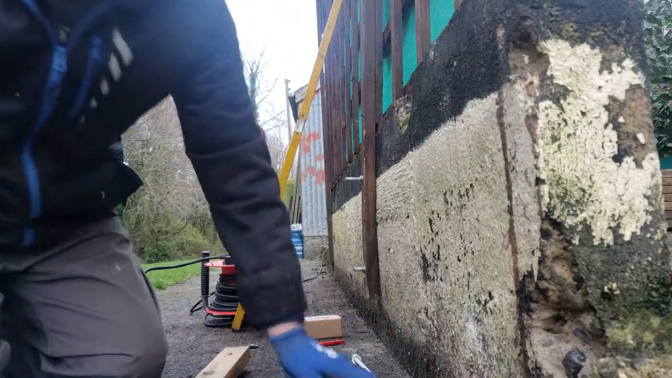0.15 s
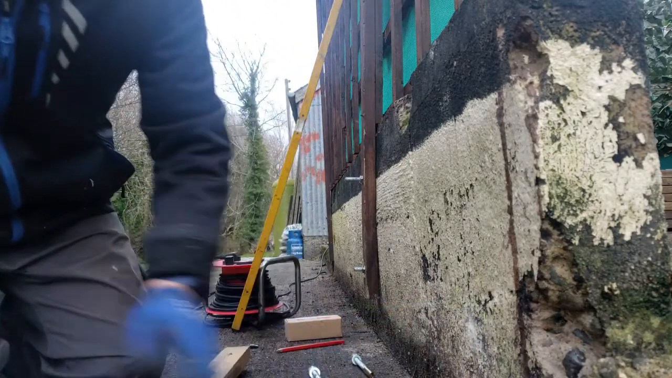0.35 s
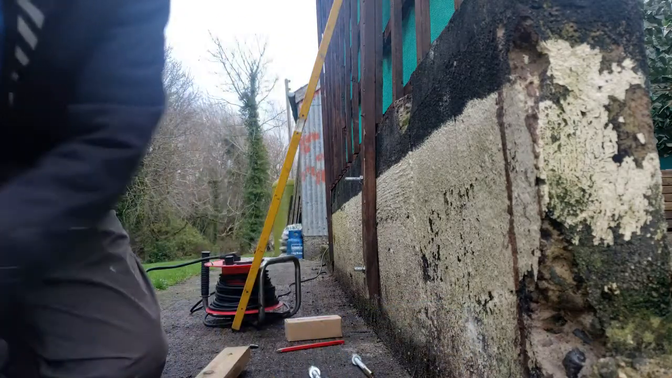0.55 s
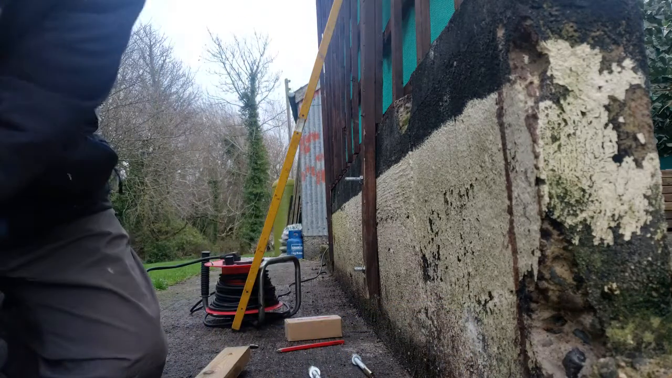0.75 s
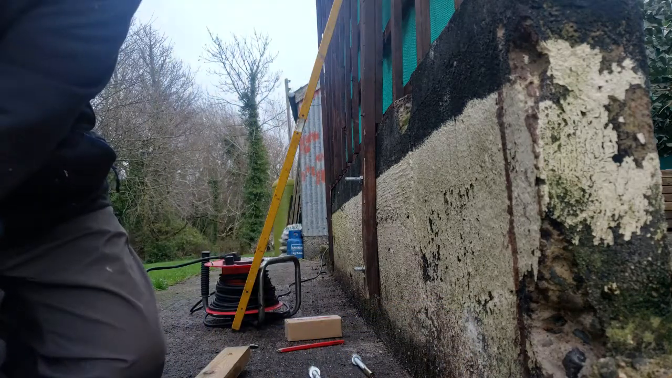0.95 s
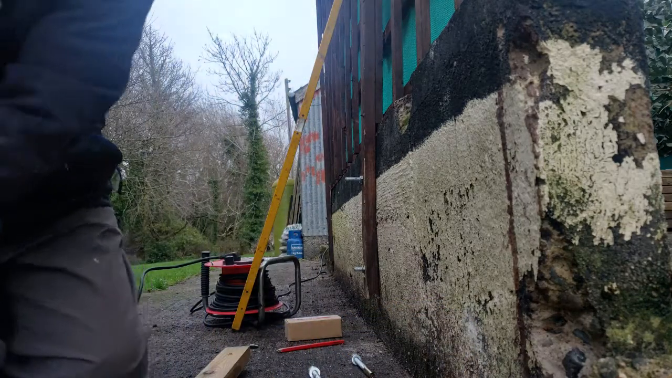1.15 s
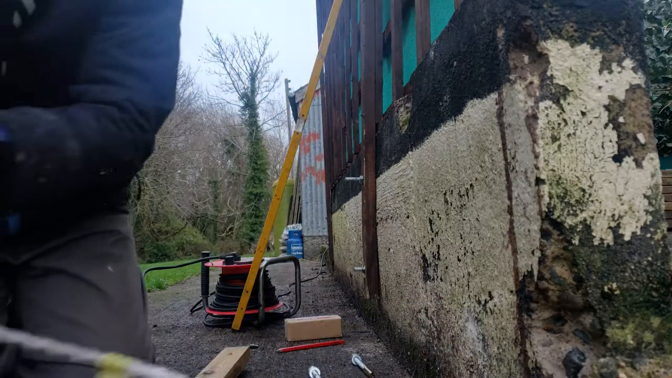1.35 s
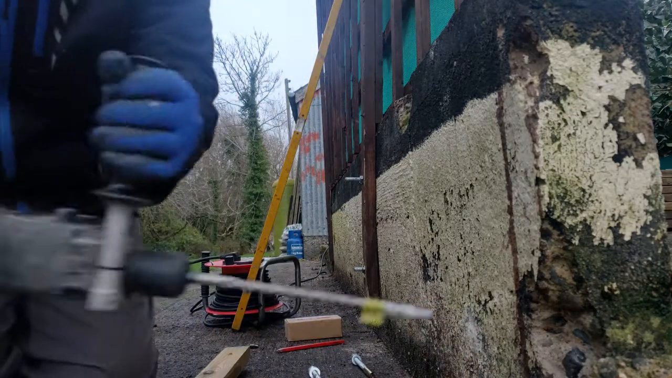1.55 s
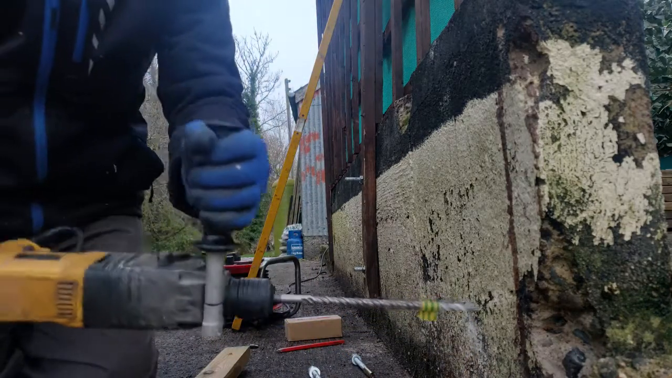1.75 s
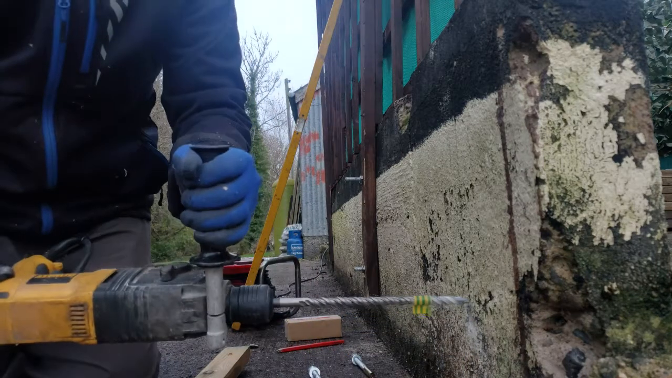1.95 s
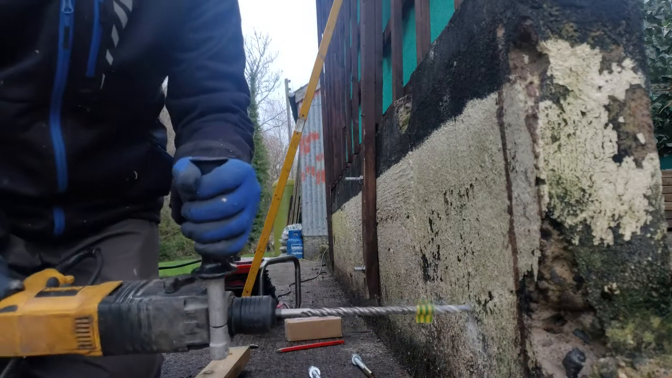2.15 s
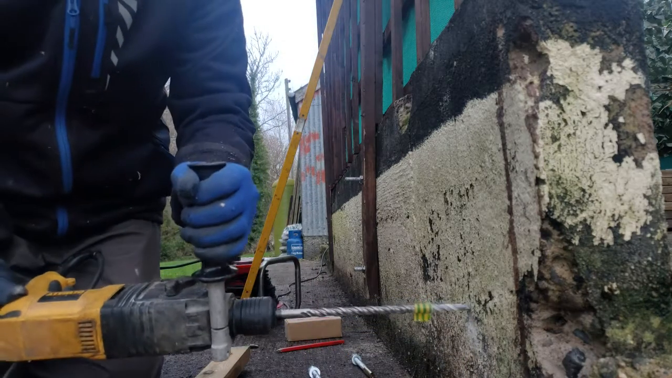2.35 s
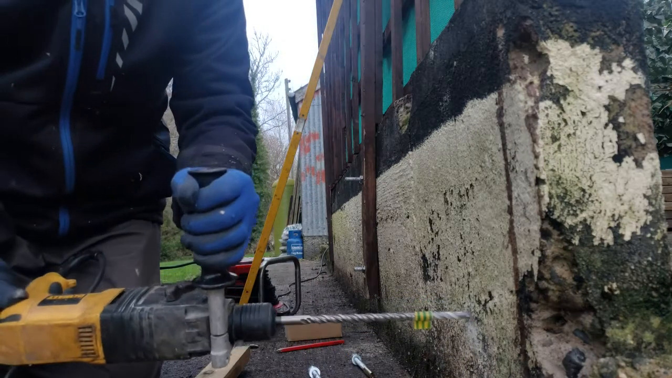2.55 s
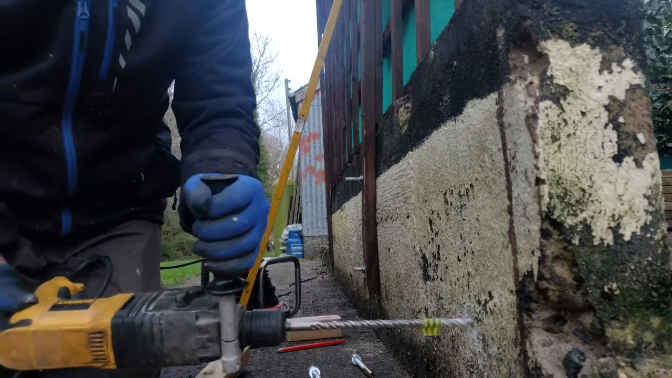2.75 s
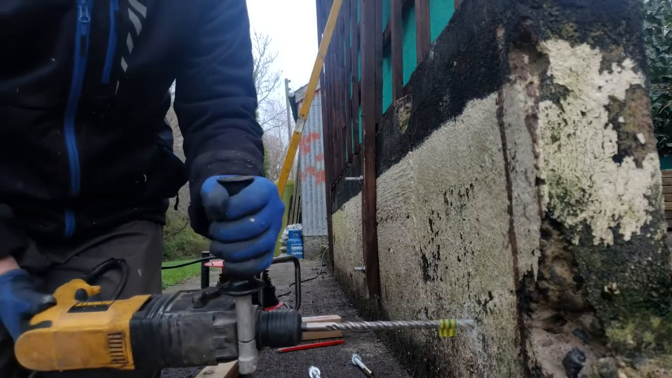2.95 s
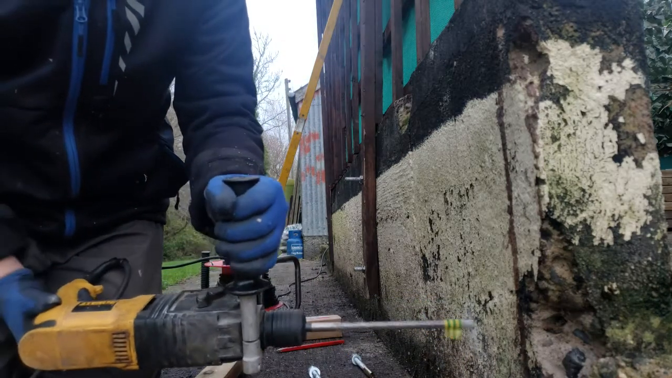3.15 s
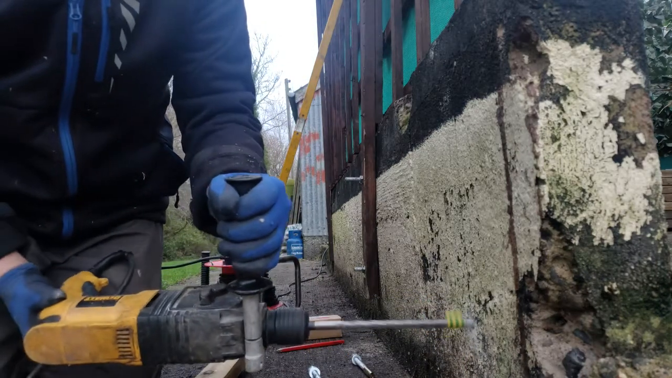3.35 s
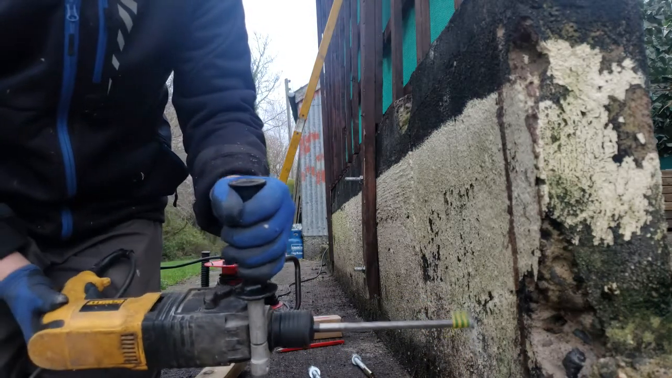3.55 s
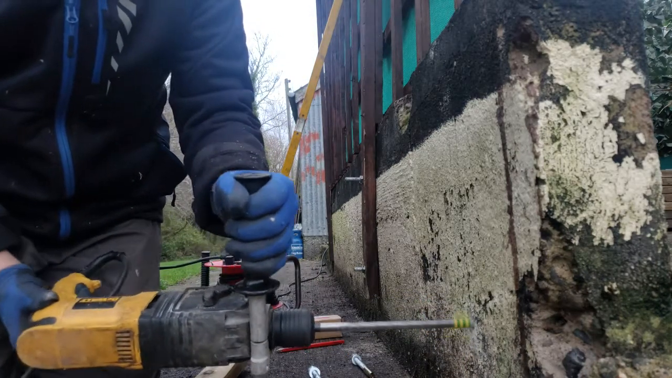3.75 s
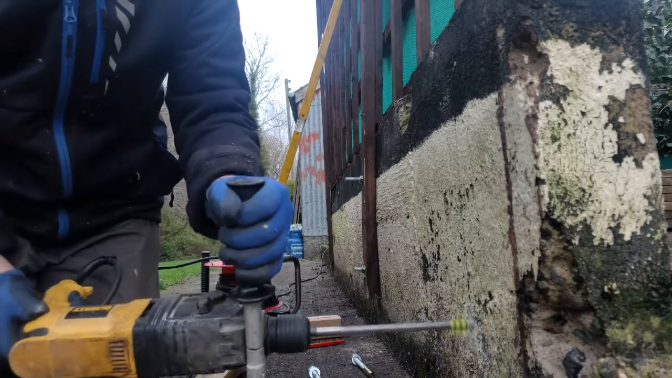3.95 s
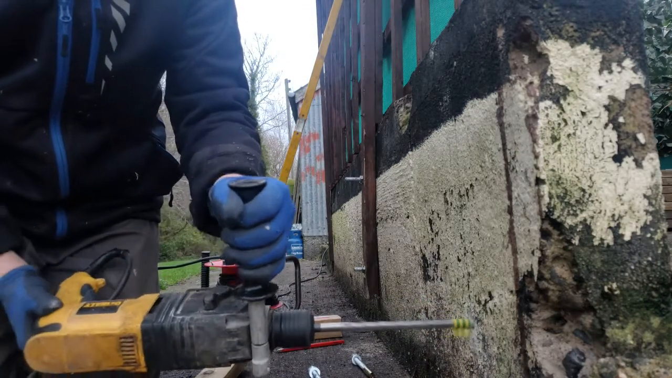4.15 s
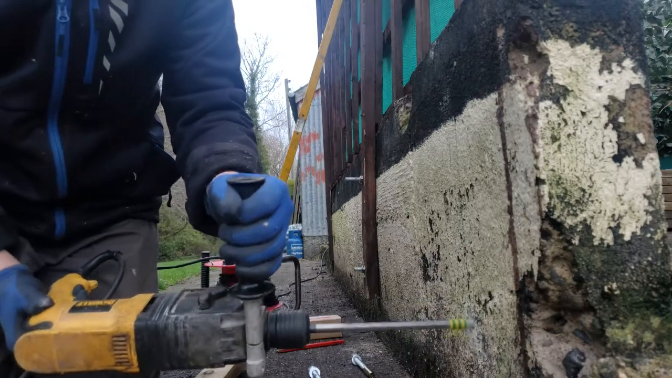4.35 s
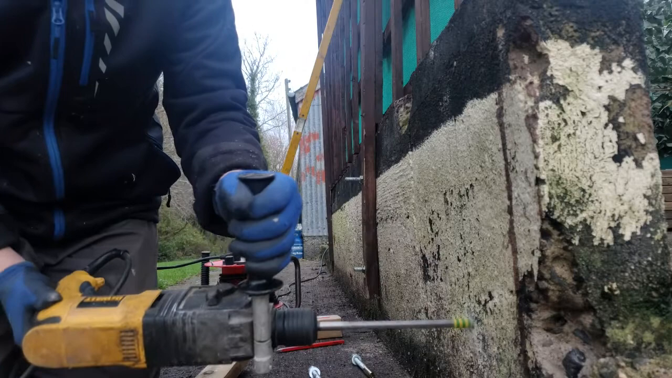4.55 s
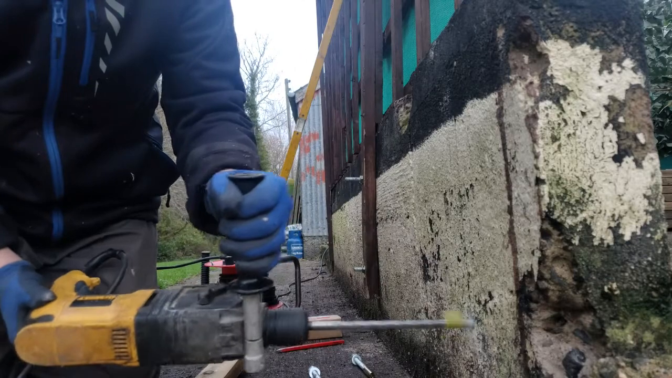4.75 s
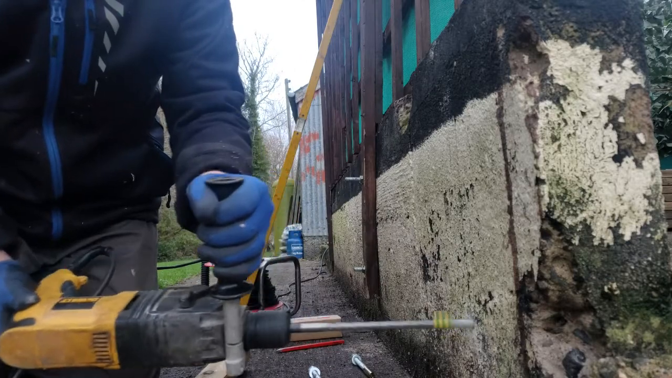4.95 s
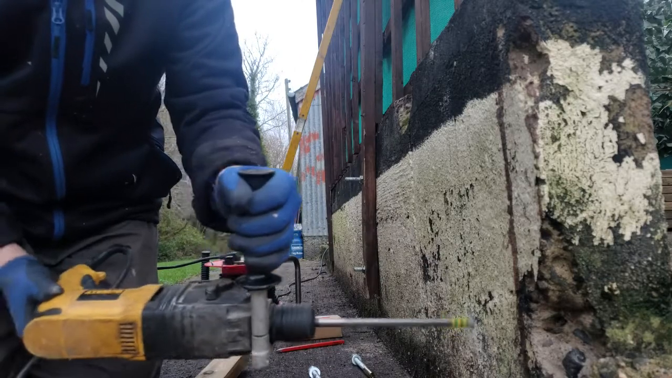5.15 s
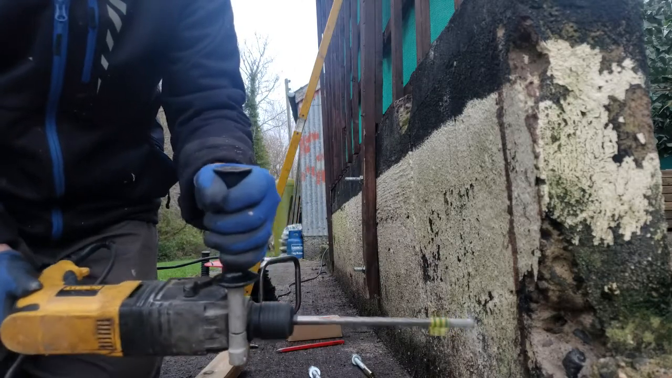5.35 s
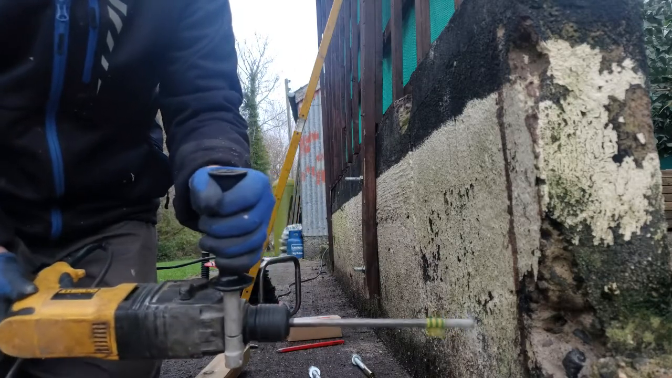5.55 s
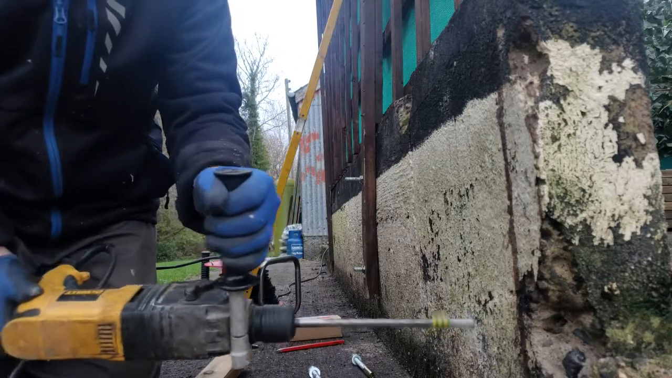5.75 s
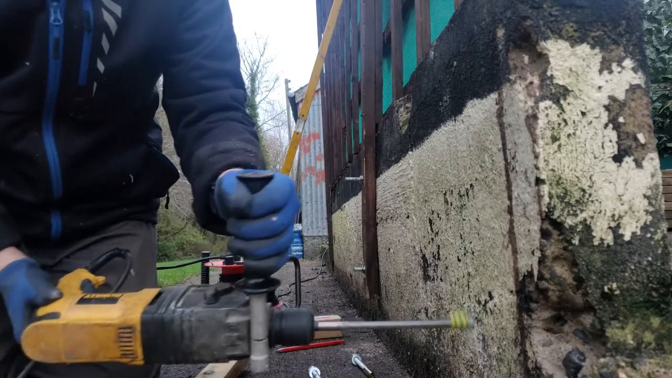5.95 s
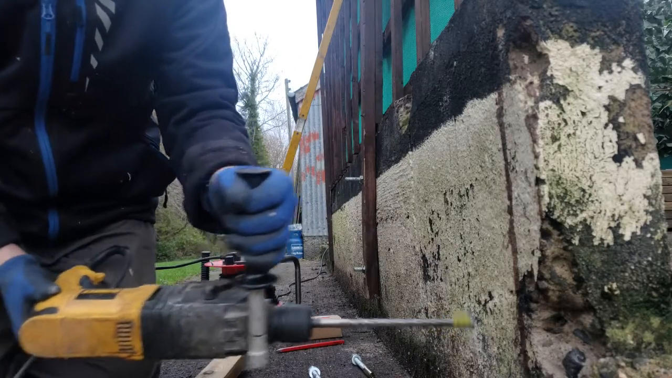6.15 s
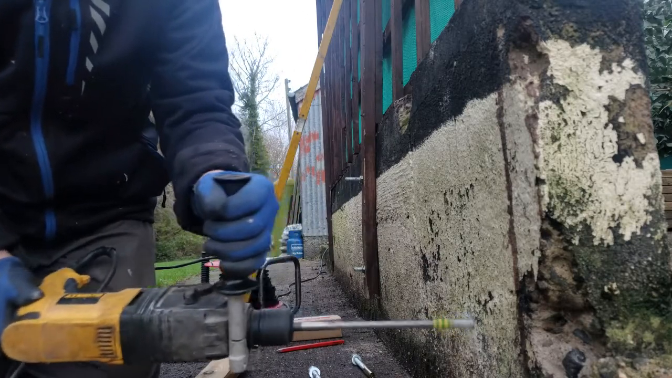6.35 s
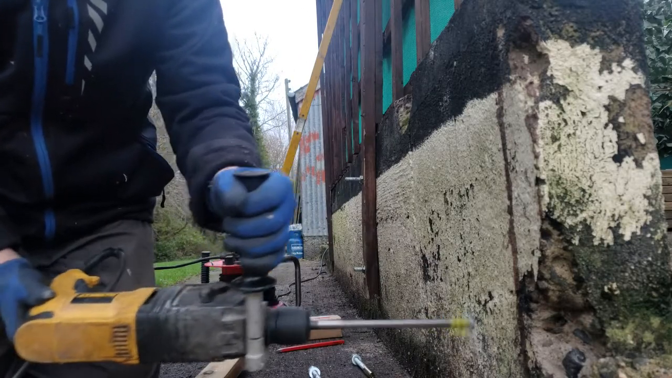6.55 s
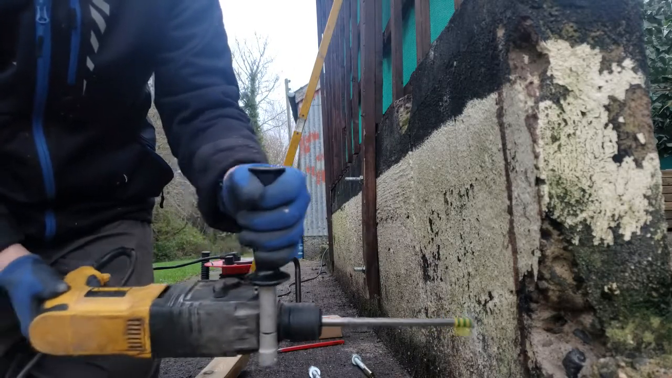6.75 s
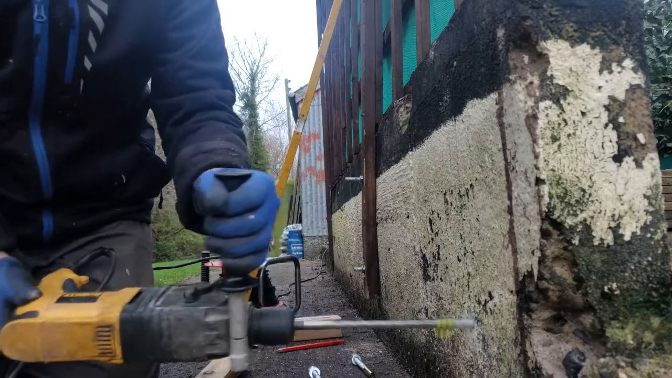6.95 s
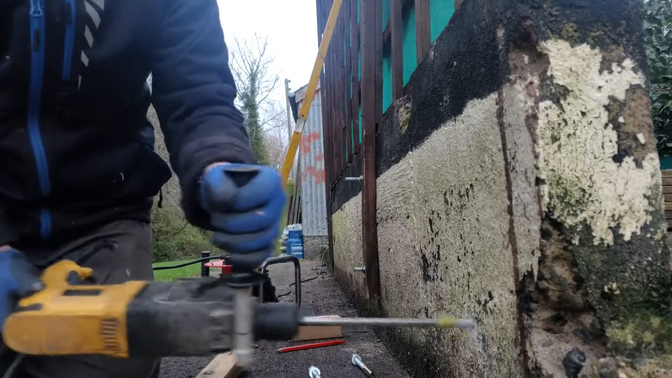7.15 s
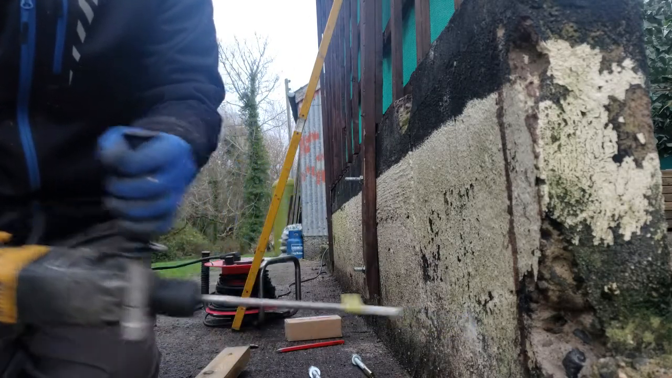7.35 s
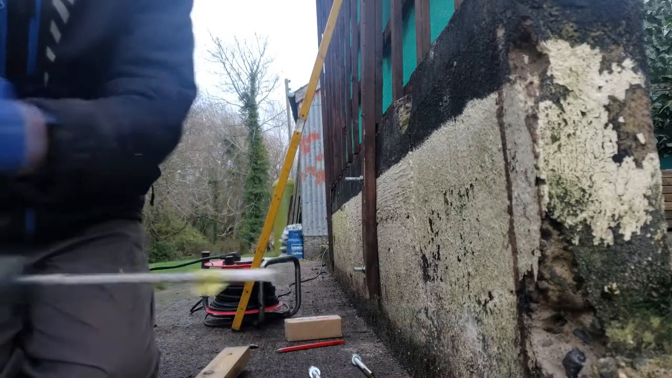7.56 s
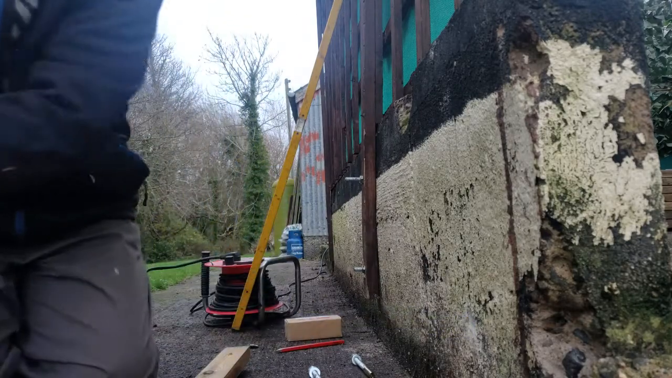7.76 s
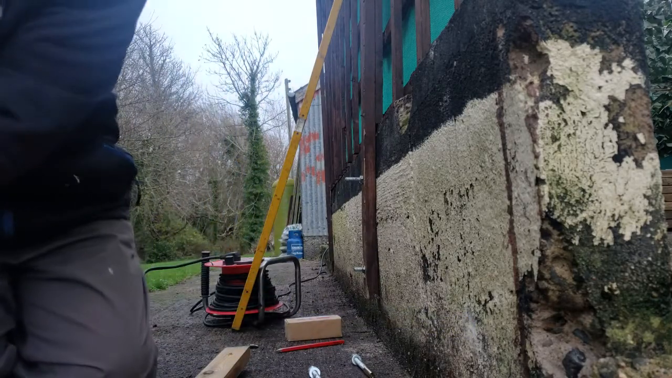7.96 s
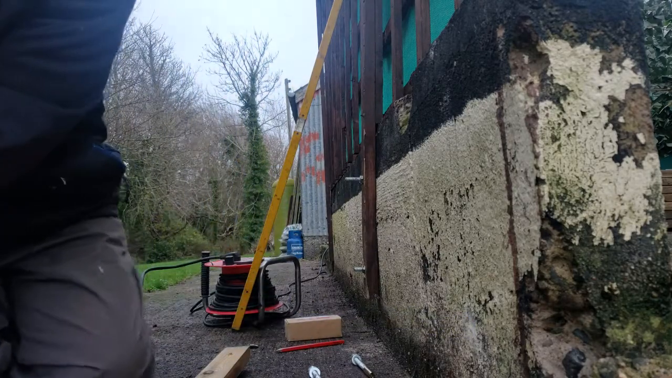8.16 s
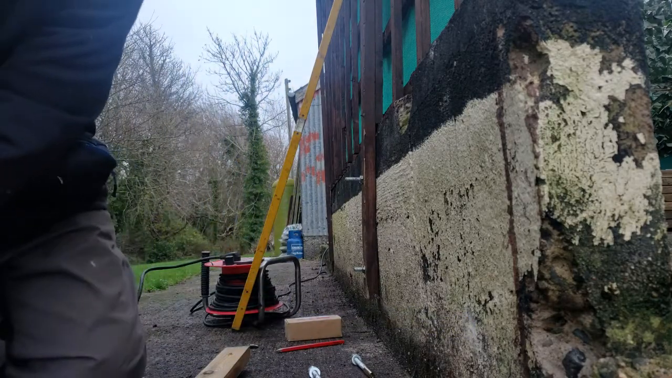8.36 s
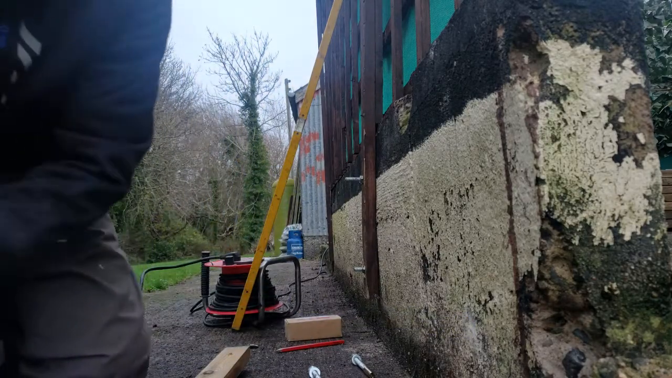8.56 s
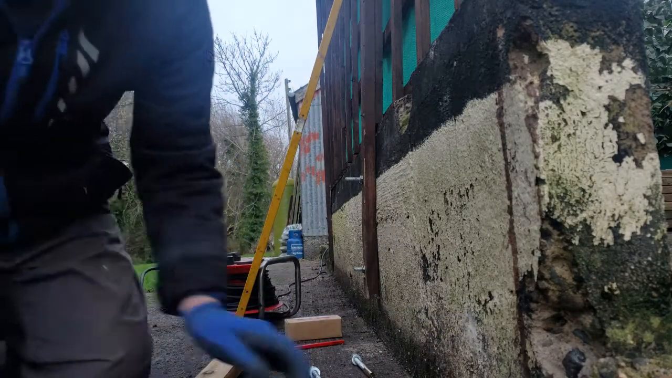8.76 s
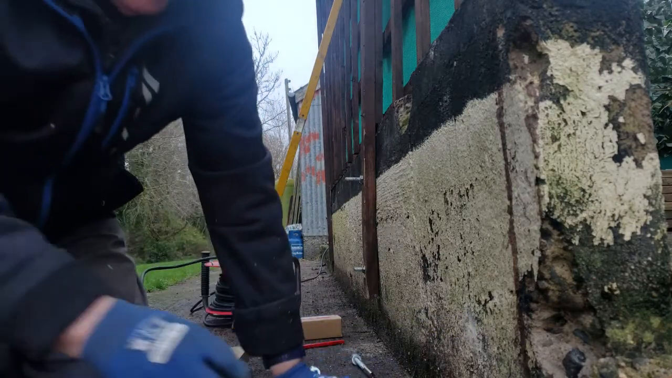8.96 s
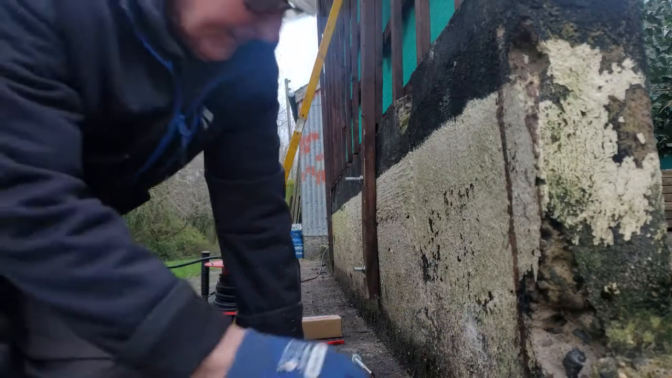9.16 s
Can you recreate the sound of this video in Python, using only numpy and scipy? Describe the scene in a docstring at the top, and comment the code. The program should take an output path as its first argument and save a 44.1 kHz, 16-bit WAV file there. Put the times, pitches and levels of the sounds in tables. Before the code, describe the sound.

Gritty knocks and scrapes, a light tap on a wall, then a loud close hammer drill buzzing and whining before it rasps and clatters to a stop.

```python
"""Outdoors, over rumble and rustle, a corded hammer drill is dragged off the ground: noise bursts and scraping grit.
Its bit taps a masonry wall: decaying noise through the bit's resonances. The motor runs up; one speed curve drives
about 81 blows a second (noise bursts in resonances), hum and a thin whine; the bit rattles at each easing back.
Trigger let go, the drill coasts down with rasping gears, falling whine and ever slower clacks, close and to the left."""
import sys
import numpy as np
from scipy import signal
from scipy.fft import rfft, irfft, next_fast_len
from scipy.io import wavfile

SR = 44100
rng = np.random.default_rng(int(sys.argv[2]) if len(sys.argv) > 2 else 0)


def wav_record(signal):
    """Record a signal, one row per channel, as 16-bit PCM in the file named by sys.argv[1]."""
    frames = np.transpose(np.atleast_2d(signal))
    bounded = np.clip(frames, -1, 1)
    # unit amplitude maps onto the largest positive 16-bit level
    quanta = np.round(bounded * 32767).astype(np.int16)
    wavfile.write(sys.argv[1], SR, quanta)


N = 409683
TIME = np.arange(N) / SR
SIZE = next_fast_len(N + 4096)
BINS_HZ = np.maximum(np.arange(SIZE // 2 + 1) * SR / SIZE, 1)

# All table levels are relative; the sources scale them further.
# Surroundings. Each row: time in seconds, low rumble in dB, rustle in dB.
YARD_LEVELS = [(0.0, -54, -64.5), (0.74, -53.5, -68.5), (1.09, -50, -55.5), (1.81, -53, -71.5),
               (2.8, -54, -74), (3.02, -52, -64), (8.6, -64, -69), (8.96, -55.5, -64.5),
               (9.29, -54.5, -71.5)]
# Air from the motor's fan on the microphone. Each row: time in seconds, level in dB.
FAN_BUFFET = [(3.15, -74), (3.55, -60), (3.66, -39.5), (4.5, -50.5), (4.85, -79), (6.0, -80), (6.1, -49),
              (6.25, -77), (7.2, -61.5), (7.5, -48), (7.8, -64), (8.7, -73)]
# Noise spectra. Each row: frequency in Hz, level in dB per Hz.
RUMBLE_SPECTRUM = [(12, -64), (20, -29.5), (46, -12), (70, 4.5), (108, -7.5), (139, -7), (161, -21),
                   (220, -18), (284, -24.5), (500, -41.5), (650, -77.5), (1100, -120)]
RUSTLE_SPECTRUM = [(210, -44), (350, -17), (417, -16), (548, -7.5), (914, 3), (1220, -2.5), (1650, -4),
                   (1940, -8.5), (3560, -4), (8040, -11), (16000, -14)]
AIR_SPECTRUM = [(15, -26.5), (28, -15), (48, -2), (80, 3), (140, -15.5), (300, -26), (1000, -102)]
GRIT_SPECTRUM = [(150, -32), (250, -4), (550, -9), (1200, -8.5), (2130, -13), (3100, -4.5), (5500, -5.5),
                 (8000, -14), (14400, -9.5), (16000, -8)]
CASING_SPECTRUM = [(60, -31), (170, -36.5), (500, -10), (800, -5), (1000, -6.5), (1800, -5.5), (2300, -10),
                   (3200, -4), (4300, -6.5), (5300, -7.5), (6900, -8.5), (7800, -16.5), (11000, -9),
                   (14500, -12)]

# Tool, plug and grit on the ground. Each row: start in seconds, level in dB, centre in Hz, t60 in seconds,
# left-right difference in dB.
GROUND_KNOCKS = [(0.076, -45.5, 6500, 0.028, 15), (0.464, -38, 4870, 0.017, 14),
                 (0.796, -40.5, 4900, 0.036, 26), (0.822, -41, 5130, 0.047, 10),
                 (0.874, -44, 4000, 0.028, 14), (0.919, -33.5, 4040, 0.019, 13),
                 (0.933, -25.5, 9800, 0.013, 23), (0.9525, -25, 3600, 0.024, 9),
                 (0.956, -22, 1100, 0.016, 6), (0.966, -43, 5500, 0.014, 14),
                 (1.001, -18.5, 12900, 0.024, 12), (1.018, -34, 6300, 0.032, 9),
                 (1.032, -34, 900, 0.045, 3), (1.164, -37, 11000, 0.008, 10),
                 (1.183, -37, 11000, 0.008, 10), (1.2038, -28, 3300, 0.032, 8),
                 (1.209, -37, 12000, 0.01, 10), (1.224, -43, 5500, 0.02, 8), (1.252, -35, 1320, 0.042, 10),
                 (1.423, -38, 5800, 0.0087, 20), (2.958, -57, 3380, 0.025, 18), (8.763, -52, 756, 0.017, 6)]
# Soft bumps. Each row: start in seconds, level in dB, pitch in Hz, t60 in seconds.
SOFT_BUMPS = [(0.907, -32, 230, 0.025), (0.953, -36, 606, 0.024), (8.212, -40, 88, 0.065)]
# Dragged tool, rubbing clothes. Each row: start in seconds, end in seconds, level in dB, ring in Hz.
DRAG_RUBS = [(0.722, 0.87, -59.5, 4470), (0.902, 0.986, -49.5, 3860), (0.993, 1.107, -45, 3230),
             (1.133, 1.26, -49, 3000), (1.25, 1.346, -54.5, 3860), (1.428, 1.658, -60.5, 1700),
             (2.023, 2.037, -59, 3900), (2.11, 2.213, -67, 1100), (2.41, 2.5, -76, 2390),
             (2.856, 2.953, -66, 3800), (2.947, 3.002, -63, 4400), (8.36, 8.48, -51.5, 3440)]
RUB_ATTACK_S, RUB_SAG_DB_PER_S, RUB_RELEASE_S = 0.013, 16, 0.022

# The tip touches the wall. Each row: start in seconds, level in dB.
TIP_TAPS = [(1.7706, -28.5), (2.033, -52), (2.111, -39), (2.421, -56), (2.767, -47)]
# Hard strokes of the unloaded striker. Each row: start in seconds, level in dB.
START_CLACKS = [(3.067, -56), (3.077, -48), (3.087, -37), (3.0958, -28), (3.1225, -19.5), (3.1344, -20.5),
                (3.147, -6), (3.1542, -20.5), (3.171, -15.5), (3.186, -16)]
# Work of the drill, less once the bit is deep. Each row: time in seconds, casing noise in dB, stroke weight in dB.
WORK_LEVELS = [(3.05, -63, -76), (3.1, -50, -32), (3.14, -32.5, -27.5), (3.17, -20, -19),
               (3.205, -25, -26.5), (3.5, -24.5, -28), (3.8, -26.5, -28), (4.81, -28.5, -31),
               (4.87, -35, -37.5), (5.85, -34.5, -38.5), (6.12, -33, -36), (6.45, -34.5, -38),
               (7.3, -34, -39)]
# Bit eased back, bouncing loose in the chuck. Each row: start in seconds, end in seconds, rattle in dB,
# drop in level in dB, drop in speed in turns per second.
BIT_EASES = [(4.573, 4.596, -27.5, 7.5, 1.5), (4.697, 4.727, -31, 0.5, 0), (4.86, 4.953, -33.5, 5, 19.5),
             (5.909, 6.006, -36, 6.5, 8.5), (6.241, 6.322, -37, 7.5, 15), (6.505, 6.599, -41.5, 5, 10),
             (6.795, 6.889, -32.5, 4.5, 9.5), (7.085, 7.151, -32, 3.5, 2.5)]
# Eased bit slams against its stop in the chuck. Each row: start in seconds, level in dB.
CHUCK_JOLTS = [(4.6944, -11), (4.8758, -13), (4.9003, -17), (5.9179, -12), (5.9818, -15), (6.0192, -14.5),
               (6.2404, -18.5), (6.2647, -15.5), (6.2764, -18), (6.5296, -11), (6.554, -16.5),
               (6.5814, -6.5), (6.792, -15), (6.8294, -17), (6.8673, -18.5), (7.1038, -16.5), (7.1287, -17)]
# Whine under power. Each row: time in seconds, level in dB.
POWER_WHINE = [(3.13, -71.5), (3.16, -43), (3.21, -43.5), (3.25, -20.5), (3.55, -32.5), (3.8, -18.5),
               (4.0, -21.5), (4.4, -19), (5.05, -28.5), (6.15, -26.5), (7.3, -29.5)]
# Brief dips of the whine. Each row: start in seconds, end in seconds, change in dB.
WHINE_DIPS = [(4.05, 4.122, -7), (4.446, 4.51, -13.5), (4.78, 4.8, -14), (5.508, 5.868, -13)]
# Unloaded gears. Each row: time in seconds, rasp of the teeth in dB, gearbox chatter in dB.
GEAR_LEVELS = [(7.15, -56, -80), (7.38, -34.5, -69), (7.56, -38.5, -42), (7.68, -49, -49),
               (7.86, -70, -50.5), (8.1, -68, -47), (8.22, -71, -55.5), (8.42, -78, -58.5),
               (8.75, -91, -71.5)]
# Falling whine. Each row: time in seconds, level in dB.
FALLING_WHINE = [(7.315, -36), (7.42, -37), (7.55, -41), (7.72, -52), (7.84, -59), (7.9, -52), (8.0, -63),
                 (8.1, -59), (8.17, -57), (8.22, -72)]
# Last strokes of the coasting drill. Each row: start in seconds, level in dB.
FINAL_CLACKS = [(7.738, -24), (7.7597, -25), (7.782, -24), (7.8055, -24), (7.8291, -27), (7.853, -24),
                (7.906, -34), (7.9327, -31), (7.9648, -27), (7.995, -25), (8.0283, -24), (8.062, -32),
                (8.075, -31), (8.114, -28), (8.1624, -37), (8.2172, -35), (8.2225, -35), (8.268, -35),
                (8.325, -40)]

# Hum partials. Each row: multiple of the stroke rate, level in dB.
STROKE_PARTIALS = [(1, -10), (2, -29), (3, -18), (4, -16), (5, -14), (6, -9), (7, -6.5), (8, -7), (9, -12),
                   (10, -3.5), (11, -6), (12, -6), (13, -10), (14, -11), (15, -6), (16, -10), (17, -9),
                   (18, -11), (20, -11)]
# Hum partials. Each row: multiple of the rotor speed, level in dB.
ROTOR_PARTIALS = [(1, -8.5), (2, 0.5), (3, -12.5), (4, -5), (6, -16), (8, -19), (10, -10.5), (12, -6)]
# Contacts in every stroke (blow, rebound, piston return, catch). Each row: point of the stroke 0-1,
# t60 in seconds, level in dB in the housing, in the shank, in the stone.
STROKE_CONTACTS = [(0, 0.005, 7, 13, 6.5), (0.15, 0.014, 7, 8, 5), (0.46, 0.01, 4, 4, 3.5),
                   (0.7, 0.011, 3.5, 1, 4)]
# Housing resonances. Each row: centre in Hz, width in Hz, height in dB.
HOUSING_MODES = [(806, 83, 7.5), (2190, 390, 8.5), (5130, 170, 1), (6620, 2300, 2)]
# Bit resonances. Each row: centre in Hz, width in Hz, level in dB in the hole, level in dB in free air.
BIT_MODES = [(2090, 160, -23, -15.5), (3930, 280, -11, -9.5), (5700, 300, -19, -12.5), (6600, 180, -8, 3.5),
             (9120, 63, -5, 4.5), (12110, 190, 3.5, -1), (12600, 770, 2, -8.5), (15500, 170, -11, 1.5)]
# Resonances of gearbox, of shank and stone in the grinding hole, and of the struck stone.
# Each row: centre in Hz, width in Hz, level in dB.
GEARBOX_MODES = [(824, 180, 2.5), (1450, 720, 8.5), (2030, 540, 2.5), (3370, 420, 1)]
GRIND_MODES = [(1234, 220, -6), (1640, 280, -9.5), (2156, 270, 0), (2415, 210, -1.5), (3150, 530, -1),
               (3460, 170, -4), (4040, 550, -3.5), (4870, 290, -4), (5430, 400, -4.5), (6360, 200, -3.5)]
STONE_MODES = [(5360, 340, -2), (6950, 450, -13), (11100, 3000, 1.5)]
# Left-right balance of the ports. Each row: frequency in Hz, left minus right in dB.
PORT_BALANCE = [(60, 1), (200, -0.5), (500, 1.5), (800, 0), (1150, 8), (1800, 3), (2300, 5.5), (3200, 2),
                (5300, 2), (6900, 13.5), (9000, 15.5), (11000, 8.5), (12100, 2), (15000, 12)]
# Phase lead of the left port. Each row: frequency in Hz, lead in radians.
PORT_LEAD = [(60, 0.5), (500, -0.2), (780, 2), (1400, 1.73), (2100, 3), (3400, 1.5), (4300, 7.5),
             (6800, 7.5), (15000, 7.5)]

TRIGGER_ON_S, TRIGGER_OFF_S, HUM_BUILD_S = 3.065, 7.315, 0.16
# run-up: even climb to a knee, then slow approach to full speed
CLIMB_TURNS_PER_S2, KNEE_TURNS_PER_S, SETTLE_S, FULL_TURNS_PER_S = 1950, 274, 0.1835, 393.3
# coasting: time constant of the air drag, braking by friction
DRAG_S, FRICTION_TURNS_PER_S2 = 1.3, 154
TURNS_PER_STROKE, WHINE_CYCLES_PER_TURN = 4.833, 40
CASING_POWER, WEIGHT_POWER = 2.5, 3.4    # exponents on the coasting speed
EASE_FALL_S, EASE_RETURN_S, SPEED_RECOVER_S = 0.02, 0.03, 0.135
WEIGHT_SHARE, WHINE_SHARE = 0.66, 0.98    # shares of each easing's dB drop
COAST_CLACK_DB, COAST_SPREAD_DB, LAST_CLACK_DB = -27.5, 1.5, -3
# part of a stroke subtracted from the count; speed above which coasting clacks follow every stroke
CLACK_PHASE, CLACK_SINGLE_TURNS_PER_S = 0.8, 231
CONTACT_SPREAD_DB = 2.2
SHELL_DB, HOUSING_DB, BUZZ_DB, GRIND_DB, CHISEL_DB = 3.5, 6.5, 2.5, 1.5, -3
STROKE_HUM_DB, ROTOR_HUM_DB = -3, -7.5
CUTOFF_HZ = 15850


def from_db(db):
    return 10 ** (np.asarray(db) / 20)


def rms_one(x):
    return x / np.sqrt(np.mean(x ** 2) + 1e-20)


def in_time(rows):
    """Columns interpolated over time, in their own units."""
    s, *columns = np.transpose(rows)
    return [np.interp(TIME, s, c) for c in columns]


def gains(rows):
    """Level curves as gains, silent outside their span."""
    s, *columns = np.transpose(rows)
    return [np.interp(TIME, s, from_db(c), left=0, right=0) for c in columns]


def at_bins(points):
    """A curve over log frequency, read at the FFT bins."""
    hz, value = np.transpose(points)
    return np.interp(np.log(BINS_HZ), np.log(hz), value)


def drift(rate_hz):
    """Slow random curve of unit rms, computed every 40th sample."""
    r = np.exp(-80 * np.pi * rate_hz / SR)
    raw = rng.standard_normal(N // 40 + 2002)
    slow = signal.lfilter([1], [1, -2 * r, r * r], raw)[2000:]
    return np.interp(np.arange(N) / 40, np.arange(len(slow)), rms_one(slow))


def white():
    """Three noises: one heard by both ports, one by each alone."""
    return rng.standard_normal((3, N))


def colour(x, spectrum_db):
    """Shape by a spectrum, keeping the power of white noise."""
    return irfft(rfft(x, SIZE) * rms_one(from_db(spectrum_db)), SIZE)[..., :N]


def resonate(x, modes):
    """Parallel two-pole resonances, keeping the power of white noise."""
    out = 0
    for hz, width_hz, db in modes:
        r = np.exp(-np.pi * width_hz / SR)
        poles = [1, -2 * r * np.cos(2 * np.pi * hz / SR), r * r]
        ring = signal.lfilter([1, 0, -1], poles, x + 1e-18)
        out = out + from_db(db) * np.sqrt((1 - r * r) / 2) * ring
    return out / np.sqrt(sum(from_db(db) ** 2 for _, _, db in modes))


def gliding(x, hz, width_hz):
    """A resonance whose centre moves, keeping the power of white noise."""
    r = np.exp(-np.pi * width_hz / SR)
    turn = np.exp(2j * np.pi * np.cumsum(hz) / SR)
    baseband = signal.lfilter([1], [1, -r], x / turn + 1e-18)
    return np.sqrt(2 * (1 - r * r)) * (baseband * turn).real


def fade(clicks, t60_s):
    """Every click opens an envelope that dies away exponentially."""
    return signal.lfilter([1], [1, -from_db(-60 / (t60_s * SR))], clicks + 1e-18)


def swell(start_s, end_s, attack_s, release_s):
    """Rise evenly from the start, hold, die away after the end."""
    return np.clip((TIME - start_s) / attack_s, 0, 1) * np.exp(-np.maximum(TIME - end_s, 0) / release_s)


def clicks_at(rows):
    """Single-sample clicks at the listed times."""
    out = np.zeros(N)
    for s, db in rows:
        out[round(s * SR)] = from_db(db)
    return out


def pair(x, likeness, pan_db=0):
    """Mix a part shared by the ports with one of each port's own."""
    share = np.clip(likeness, 0, 1)
    ports = np.sqrt(share) * x[0] + np.sqrt(1 - share) * x[1:]
    return ports * from_db(np.array([[.5], [-.5]]) * pan_db)


def from_left(x):
    """Drill at the left: level and phase differ between ports with frequency, power kept."""
    half = from_db(at_bins(PORT_BALANCE) / 2) * np.exp(.5j * at_bins(PORT_LEAD))
    power = (abs(half) ** 2 + abs(half) ** -2) / 2
    return irfft(rfft(x, SIZE) * np.array([half, 1 / half]) / np.sqrt(power), SIZE)[:, :N]


def off_centre(x):
    """Sound from the far left reaches the right port 17 samples later."""
    return np.array([x[0], np.roll(x[1], 17)])


def surroundings():
    """Far rumble, rustling clothes and leaves, and puffs of air on the ports: coloured noise."""
    rumble_db, rustle_db = in_time(YARD_LEVELS)
    buffet, = gains(FAN_BUFFET)
    rumble = pair(colour(white(), at_bins(RUMBLE_SPECTRUM)), likeness=0.99, pan_db=-0.5)
    rustle = pair(colour(white(), at_bins(RUSTLE_SPECTRUM)), likeness=0.053, pan_db=6.5)
    air = pair(colour(white(), at_bins(AIR_SPECTRUM)), likeness=0.89, pan_db=-8.0)
    out = from_db(rumble_db) * rumble
    out += from_db(rustle_db + 1.1 * drift(10)) * rustle
    return out + from_db(-2 + 3.4 * drift(4.0)) * buffet * air


def grit(rate_hz=420, size_db=7.5, bed_db=-1.5):
    """Sand grains snap one by one over a bed of fine rubbing."""
    grain_db = size_db * np.minimum(rng.exponential(1, N), 2.5)
    snaps = (rng.random(N) < rate_hz / SR) * from_db(grain_db)
    bed = from_db(bed_db + 2.0 * drift(40))
    return rms_one(rms_one(fade(snaps, t60_s=0.004)) + bed) * white()


def rubbing(ring_db=-4.0, width_hz=320):
    """Grit scrapes under the tool; each rub starts quickly, slackens, and rings at its own wandering pitch."""
    strength = 0
    for start_s, end_s, db, _ in DRAG_RUBS:
        sagging_db = db - RUB_SAG_DB_PER_S * np.maximum(TIME - start_s, 0)
        strength = strength + from_db(sagging_db) * swell(start_s, end_s, RUB_ATTACK_S, RUB_RELEASE_S)
    starts_s, _, _, pitches_hz = np.transpose(DRAG_RUBS)
    centre_hz = pitches_hz[np.searchsorted(starts_s[1:], TIME)] * (1 + .05 * drift(15))
    scrape = colour(grit(), at_bins(GRIT_SPECTRUM))
    return strength * (scrape + from_db(ring_db) * gliding(grit(), centre_hz, width_hz))


def knocks():
    """Hard parts hit the ground: band-passed noise with a crack, a decay and a short tail from the wall."""
    out = np.zeros((2, N))
    age_s = TIME[:SR // 5]
    for s, db, hz, t60_s, pan_db in GROUND_KNOCKS:
        edges_hz = [hz / 1.37, min(hz * 1.1, SR * .45)]
        band = signal.butter(1, edges_hz, "band", fs=SR, output="sos")
        burst = rms_one(signal.sosfilt(band, rng.standard_normal((3, len(age_s)))))
        crack = from_db(-10.0) * from_db(-60 * age_s / 0.0028)
        tail = from_db(-13.5) * from_db(-60 * age_s / 0.044)
        dying = crack + from_db(-60 * age_s / t60_s) + tail
        at = round(s * SR)
        out[:, at:at + len(age_s)] += from_db(db - 12.0) * pair(burst * dying, likeness=0.28, pan_db=pan_db)
    return out


def bumps():
    """Soft bumps: decaying sines, equal in both ports."""
    return sum(fade(clicks_at([(s, db)]), t60_s) * np.sin(2 * np.pi * hz * (TIME - s))
               for s, db, hz, t60_s in SOFT_BUMPS)


def handling():
    """Knocks, soft bumps and grit scraping under the tool."""
    return knocks() + bumps() + from_db(-5.5) * pair(rubbing(), likeness=0.15, pan_db=8.0)


def coast_speed():
    """Full speed until the trigger is let go; then air drag and friction brake the rotor; turns per second."""
    braking = FRICTION_TURNS_PER_S2 * DRAG_S
    decay = np.exp(-np.maximum(TIME - TRIGGER_OFF_S, 0) / DRAG_S)
    return np.maximum((FULL_TURNS_PER_S + braking) * decay - braking, 0)


def rotor_speed():
    """The motor climbs, settles, sags at each easing and coasts to a stop; turns per second."""
    climb = CLIMB_TURNS_PER_S2 * np.maximum(TIME - TRIGGER_ON_S, 0)
    past_knee_s = np.maximum(climb - KNEE_TURNS_PER_S, 0) / CLIMB_TURNS_PER_S2
    shortfall = (FULL_TURNS_PER_S - KNEE_TURNS_PER_S) * np.exp(-past_knee_s / SETTLE_S)
    powered = np.minimum(climb, FULL_TURNS_PER_S - shortfall)
    sag = sum(drop * swell(start_s, end_s, end_s - start_s, SPEED_RECOVER_S)
              for start_s, end_s, _, _, drop in BIT_EASES)
    return (powered - sag) * coast_speed() / FULL_TURNS_PER_S


def stroke_count(turns):
    """The gears drive the striker: a blow lands at every whole number."""
    return (turns - np.interp(TRIGGER_OFF_S, TIME, turns)) / TURNS_PER_STROKE - CLACK_PHASE


def effort():
    """Gains of casing noise, stroke weight and whine: all dip at easings; the whine is cut with the trigger."""
    casing_db, weight_db = in_time(WORK_LEVELS)
    whine_db, = in_time(POWER_WHINE)
    eased_db = sum(db * swell(start_s, end_s, EASE_FALL_S, EASE_RETURN_S)
                   for start_s, end_s, _, db, _ in BIT_EASES)
    dips_db = sum(db * swell(start_s, end_s, attack_s=0.018, release_s=0.02)
                  for start_s, end_s, db in WHINE_DIPS)
    unpowered = np.clip((TIME - TRIGGER_OFF_S) / EASE_FALL_S, 0, 1)
    started = TIME > TRIGGER_ON_S
    running = started * coast_speed() / FULL_TURNS_PER_S
    casing = from_db(casing_db - eased_db) * running ** CASING_POWER
    weight = from_db(weight_db - WEIGHT_SHARE * eased_db) * running ** WEIGHT_POWER
    whine_level = from_db(whine_db - WHINE_SHARE * eased_db + dips_db) * started * (1 - unpowered)
    return casing, weight, whine_level


def blows(strokes, spread_db):
    """One click per stroke of the striker, randomly hard."""
    hits = np.diff(np.floor(strokes), prepend=np.floor(strokes[0]))
    return hits * from_db(spread_db * np.clip(rng.standard_normal(N), -2, 2))


def idle_strokes(strokes):
    """Clicks of the unloaded striker: hard at the start, one per stroke in coasting, then the last stragglers."""
    coasts = (TIME > TRIGGER_OFF_S) & (coast_speed() > CLACK_SINGLE_TURNS_PER_S)
    steady = coasts * from_db(COAST_CLACK_DB) * blows(strokes, COAST_SPREAD_DB)
    return clicks_at(START_CLACKS) + steady + from_db(LAST_CLACK_DB) * clicks_at(FINAL_CLACKS)


def bounces(first, t60_s, rate_hz=500):
    """Each clack is followed by smaller rebounds at random moments."""
    return first + fade(first, t60_s) * (rng.random(N) < rate_hz / SR)


def lines(turns, table, waver_db):
    """Harmonics of a rotation, each wavering in strength."""
    return sum(from_db(db + waver_db * drift(20)) * np.sin(2 * np.pi * (k * turns + rng.random()))
               for k, db in table)


def rotor_growl(turns, width_hz=45):
    """Twice per turn the rotor shakes the housing unevenly: a rough, fluctuating band."""
    lowpass = signal.butter(2, width_hz, fs=SR, output="sos")
    rough = rms_one(signal.sosfilt(lowpass, rng.standard_normal((2, N))))
    return rough[0] * np.sin(4 * np.pi * turns) + rough[1] * np.cos(4 * np.pi * turns)


def motor_hum(turns, strokes):
    """Stroke and rotor harmonics plus growl; a small tool radiates little deep bass."""
    hum = from_db(STROKE_HUM_DB) * lines(strokes, STROKE_PARTIALS, waver_db=1.5)
    hum += from_db(ROTOR_HUM_DB) * lines(turns, ROTOR_PARTIALS, waver_db=2.0)
    hum += from_db(-10) * rotor_growl(turns)
    return signal.sosfilt(signal.butter(2, 55, "high", fs=SR, output="sos"), hum)


def whine(turns, strokes, level, steady, throb=0.22, waver_db=1.8, blur_rad=0.6, flicker_db=2.5):
    """The rotor's slots sing very high, shaken by every stroke; blurred and flickering when the motor is slow."""
    flutter_db = (waver_db + (1 - steady) * flicker_db) * np.clip(drift(70), -2, 1.5)
    shake = (1 + throb * np.cos(2 * np.pi * strokes)) * from_db(flutter_db)
    wander_rad = steady * 0.54 * drift(30) + (1 - steady) * blur_rad * drift(200)
    tone = np.sin(2 * np.pi * WHINE_CYCLES_PER_TURN * turns + wander_rad)
    return np.sqrt(2) * shake * level * tone * from_db([[3.5], [-9]])


def coast_whine(turns):
    """With the current cut, the rotor's slots sing a thin, blurred falling tone that comes and goes."""
    level, = gains(FALLING_WHINE)
    waver_db = 3.5 * np.clip(drift(30), -2.5, 1) - 1
    blur_rad = .7 * drift(150)
    tone = np.sin(2 * np.pi * WHINE_CYCLES_PER_TURN * turns + blur_rad)
    return np.sqrt(2) * level * from_db(waver_db) * tone * from_db([[3.5], [-6]])


def coasting(turns, teeth_per_turn=11.0, width_hz=330, knock_db=-16.0):
    """Unloaded gear teeth rasp on a falling pitch, loose parts chatter in the gearbox, last strokes knock on it."""
    rasp, chatter = gains(GEAR_LEVELS)
    rough = rms_one(signal.sosfilt(signal.butter(2, width_hz, fs=SR, output="sos"), white()))
    teeth = np.sqrt(2) * rough * np.sin(2 * np.pi * teeth_per_turn * turns)
    octave = np.sqrt(2) * rough * np.sin(2 * np.pi * 2 * teeth_per_turn * turns)
    whir = octave * (TIME > 8.1)    # added as all else dies away
    grains = chatter * rms_one(from_db(2.5 * drift(200))) * white()
    final_knocks = from_db(knock_db) * fade(clicks_at(FINAL_CLACKS), t60_s=0.022) * white()
    gearbox = resonate(grains + final_knocks, GEARBOX_MODES)
    return rasp * (teeth + from_db(-10) * whir) + gearbox + from_db(-3) * final_knocks


def bit_modes(drive, free, vary_db=3.0):
    """The bit's resonances, gripped by the hole or free in the air, each drifting in strength."""
    modes = [(hz, width_hz, free_db if free else held_db) for hz, width_hz, held_db, free_db in BIT_MODES]
    rings = 0
    for hz, width_hz, db in modes:
        varied_db = db + vary_db * np.clip(drift(16), -2, 1.5)
        rings = rings + from_db(varied_db) * resonate(drive, [(hz, width_hz, 0)])
    return rings / np.sqrt(sum(from_db(db) ** 2 for _, _, db in modes))


def bit_ring(strokes, idle_clicks):
    """The steel bit cracks loose in the chuck and rings along its length; unloaded blows and wall taps ring it too."""
    eased = sum(from_db(db) * ((TIME > start_s) & (TIME < end_s)) for start_s, end_s, db, _, _ in BIT_EASES)
    loose = eased * blows(strokes, spread_db=2.0)
    loose_ring = from_db(8.0) * fade(loose, t60_s=0.024)
    cracks = fade(from_db(8.5) * loose, t60_s=0.0015)
    idle = from_db(-10.5) * fade(idle_clicks, t60_s=0.025)
    taps = from_db(-0.5) * fade(clicks_at(TIP_TAPS), t60_s=0.0075)
    afterring = from_db(-25) * fade(clicks_at(TIP_TAPS), t60_s=0.15)
    held = bit_modes(loose_ring * white(), free=False)
    free = bit_modes((idle + taps + afterring) * white(), free=True)
    return held + free + (cracks + from_db(-2.0) * taps) * white()


def jolting(crack_t60_s=0.0055, ring_t60_s=0.033):
    """Each jolt is a dry crack, boosted around 12.5 kHz, and a short ring of the bit."""
    jolts = clicks_at(CHUCK_JOLTS)
    crack = fade(jolts, crack_t60_s) * white()
    bright = resonate(crack, [(12500, 2000, 0)])
    ring = bit_modes(fade(jolts, ring_t60_s) * white(), free=False)
    return from_db(-4) * crack + from_db(-8) * bright + from_db(-17) * ring


def contact_noise(strokes):
    """Envelopes in housing, shank and stone: each contact leaps out of a steady bed and dies away."""
    power = np.ones((3, N))
    for point, t60_s, *part_db in STROKE_CONTACTS:
        burst = fade(blows(strokes - point, CONTACT_SPREAD_DB), t60_s)
        power += np.outer(from_db(part_db), burst) ** 2
    return [rms_one(np.sqrt(p)) for p in power]


def housing_buzz(strokes, ring_s=0.022, top_hz=3000):
    """Each blow sets off the same short ring in the housing, so the strokes fuse into a firm buzz."""
    age_s = TIME[:SR // 30]
    ring = rng.standard_normal(len(age_s)) * from_db(-20 * age_s / ring_s)
    buzz = signal.fftconvolve(blows(strokes, CONTACT_SPREAD_DB), ring)[:N]
    band = signal.butter(2, [300, top_hz], "band", fs=SR, output="sos")
    return signal.sosfilt(band, rms_one(buzz))


def grinding(shank, shift_db=4.0, shift_rate_hz=18, wander=0.03):
    """Contacts ring through the shank; its resonances shift as the turning tip catches fresh stone."""
    drive = shank * white()
    voices = 0
    for hz, width_hz, db in GRIND_MODES:
        shifted_db = db + shift_db * np.clip(drift(shift_rate_hz), -2, 2)
        voices = voices + from_db(shifted_db) * gliding(drive, hz * (1 + wander * drift(34)), width_hz)
    return voices / np.sqrt(len(GRIND_MODES))


def casing_spectrum():
    """Broad colour of the drill with its housing resonances on top, in dB."""
    peaks_db = sum(db / (1 + (2 * (BINS_HZ - hz) / width_hz) ** 2) for hz, width_hz, db in HOUSING_MODES)
    return at_bins(CASING_SPECTRUM) + peaks_db


def casing_noise(strokes, level, weight, housing, stone, idle_clicks):
    """The heavy housing carries the lows, the light shell the highs, crossing near 2 kHz."""
    clacks = from_db(0.5) * fade(bounces(idle_clicks, t60_s=0.043), t60_s=0.0034) * white()
    treble = from_db(SHELL_DB) * level * stone * white() + clacks
    bass = from_db(HOUSING_DB) * weight * housing * white() + from_db(-1.0) * clacks
    low = 1 / (1 + (BINS_HZ / 2000) ** 4)
    noise = irfft(rfft(bass, SIZE) * low + rfft(treble, SIZE) * (1 - low), SIZE)[:, :N]
    noise[0] += from_db(BUZZ_DB) * weight * housing_buzz(strokes)    # shared by both ports
    return colour(noise, casing_spectrum())


def drill():
    """One motor speed drives gears, striker, hum and whine."""
    speed = rotor_speed()
    turns = np.cumsum(speed * (1 + 0.00061 * drift(11))) / SR
    strokes = stroke_count(turns)
    level, weight, whine_level = effort()
    idle_clicks = idle_strokes(strokes)
    housing, shank, stone = contact_noise(strokes)
    noise = casing_noise(strokes, level, weight, housing, stone, idle_clicks)
    noise += bit_ring(strokes, idle_clicks) + jolting()
    noise += from_db(GRIND_DB) * grinding(level * shank)
    noise += from_db(CHISEL_DB) * resonate(level * stone * white(), STONE_MODES)    # tip chisels the stone
    force = weight * (speed.clip(0) / FULL_TURNS_PER_S) ** 0.25    # shaking forces grow with speed
    force *= np.clip((TIME - TRIGGER_ON_S) / HUM_BUILD_S, 0, 1) ** 2
    hum = force * motor_hum(turns, strokes)
    # each idle stroke jolts the whole tool
    thuds = from_db(0.5) * resonate(idle_clicks, [(169, 100, 0), (286, 42, -1.6)])
    steady = np.interp(speed, [360, 372], [0, 1])
    working = from_left(pair(noise, likeness=0.6) + hum + thuds)
    working += whine(turns, strokes, whine_level, steady)
    gears = off_centre(pair(coasting(turns), likeness=0.47, pan_db=8.0))
    return working + coast_whine(turns) + gears


def scene():
    """Surroundings and handling off centre, the drill close and to the left."""
    return off_centre(surroundings() + handling()) + drill()


def record(dry):
    """Peaks are rounded, the top is cut."""
    rounded = .68 * np.tanh(dry / .68)
    return signal.sosfilt(signal.ellip(12, .1, 80, CUTOFF_HZ, fs=SR, output="sos"), rounded)


dry = scene()
out = record(dry)
wav_record(out)
```